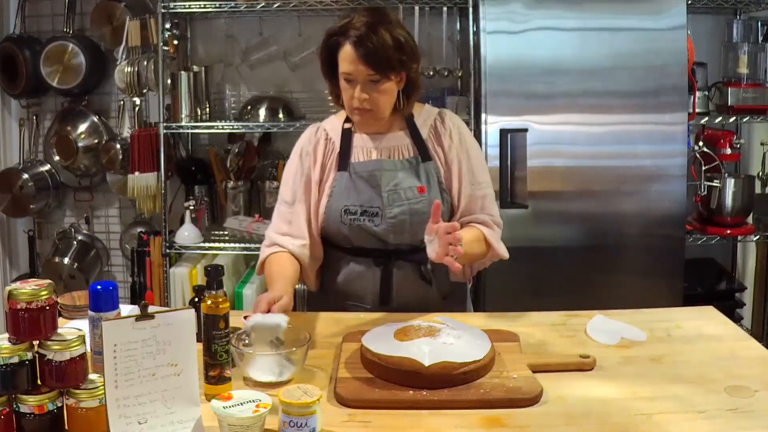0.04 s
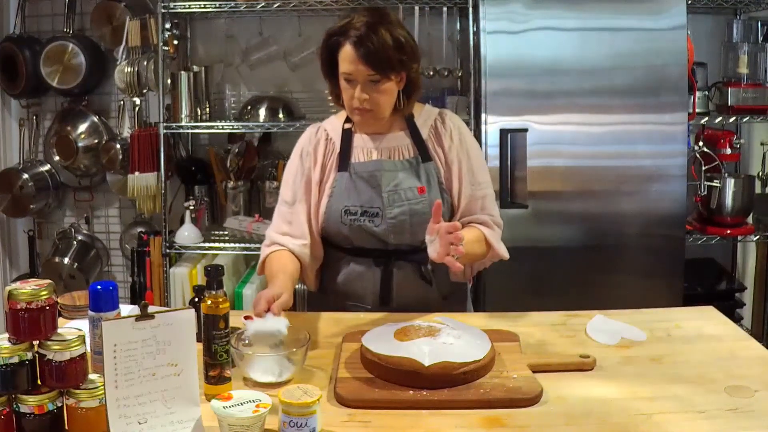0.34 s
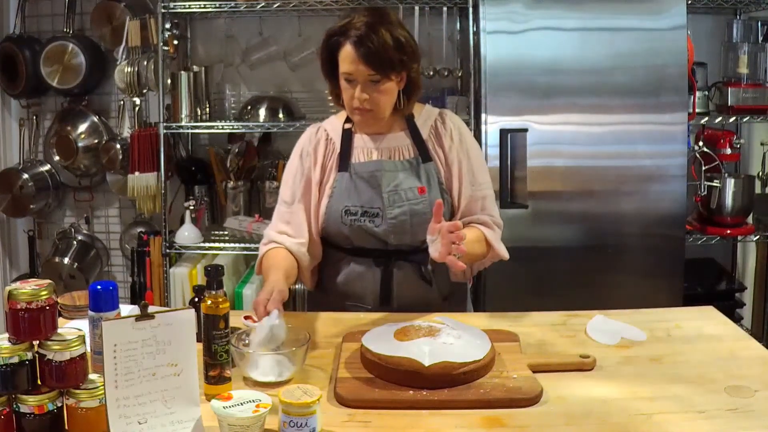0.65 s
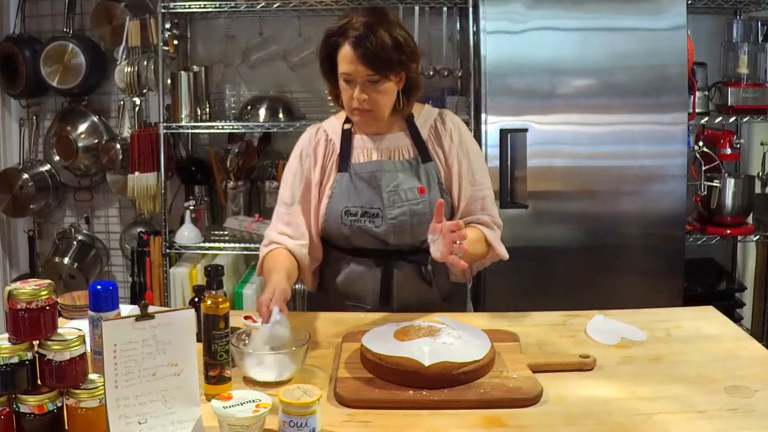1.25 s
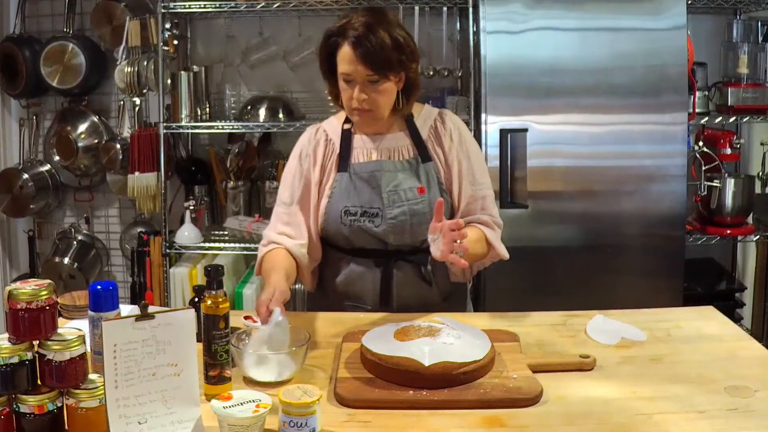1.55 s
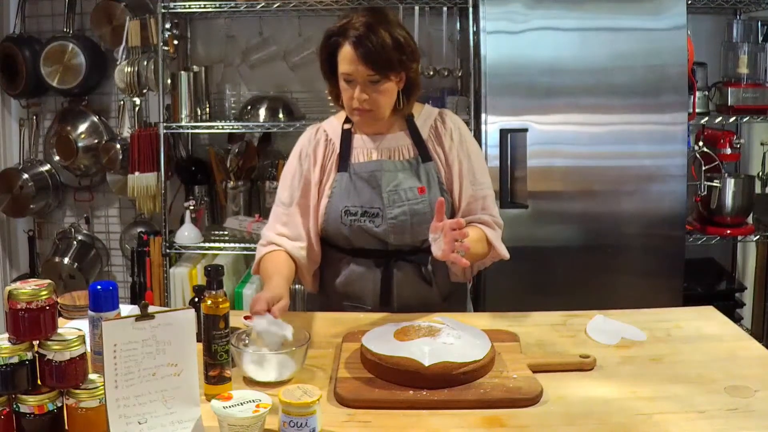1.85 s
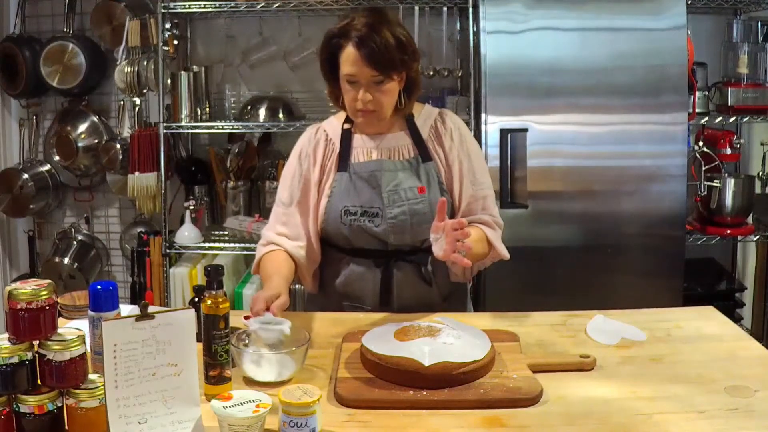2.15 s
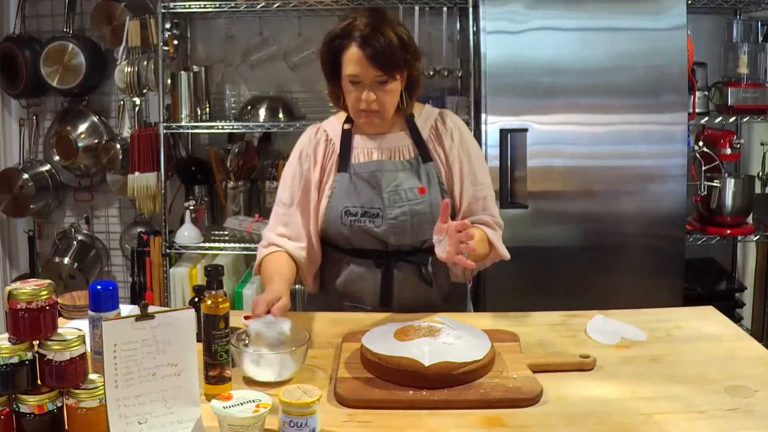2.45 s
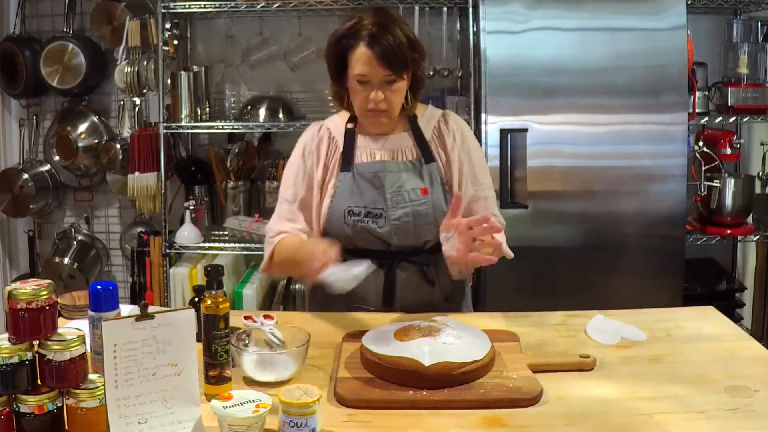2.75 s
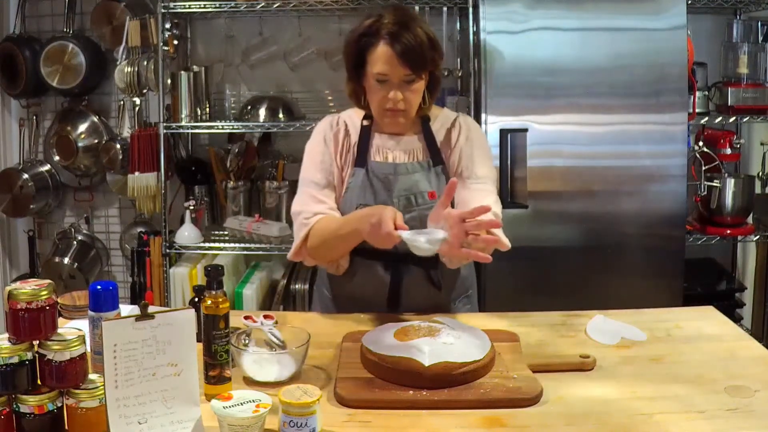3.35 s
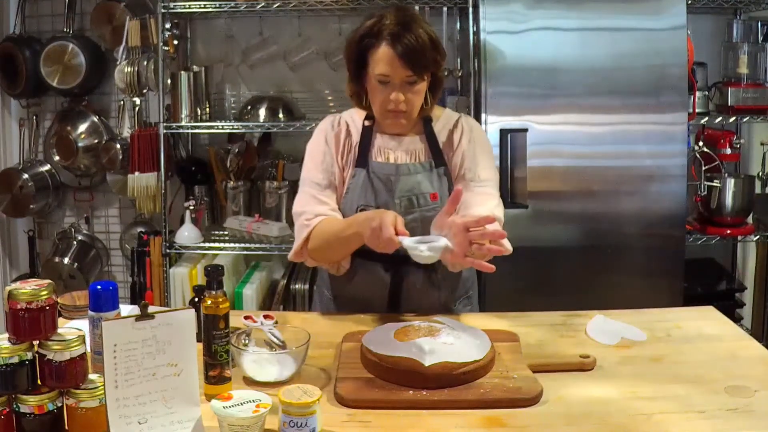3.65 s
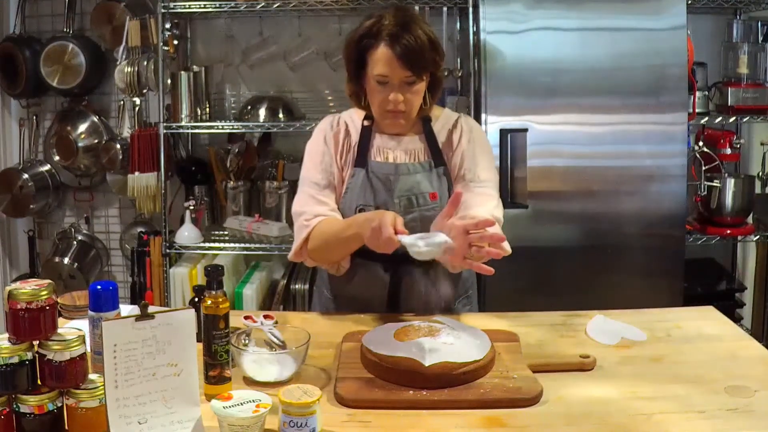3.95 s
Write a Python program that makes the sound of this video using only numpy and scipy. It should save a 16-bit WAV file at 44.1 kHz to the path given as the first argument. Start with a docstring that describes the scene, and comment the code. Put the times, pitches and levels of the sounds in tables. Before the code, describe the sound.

A small utensil clinks and knocks in a glass bowl of powder, then sifts softly.

```python
"""A small utensil scoops powder from a glass bowl on a wooden counter in a small, live kitchen.
Ventilation rumble, hiss and a low hum run throughout. From the start the scoop crunches through the
powder, clinks on the glass and knocks dully, setting bowl and counter ringing. The last knock falls
near 2.6 s and the utensil is lifted. From 2.9 s a fine crackle swells as powder is sifted, with faint
ticks from 3.3 s on."""
import sys
import numpy as np
from scipy import signal
from scipy.fft import rfft, irfft, next_fast_len
from scipy.io import wavfile
from scipy.ndimage import uniform_filter1d

SR = 44100
rng = np.random.default_rng(int(sys.argv[2]) if len(sys.argv) > 2 else 0)


def output_pcm(signal):
    """Save a mono or channel-first signal as 16-bit PCM at the path in sys.argv[1].

    Samples are clipped to [-1, 1] before scaling.
    """
    pcm = np.clip(np.atleast_2d(signal).T, -1, 1) * 32767
    wavfile.write(sys.argv[1], SR, np.round(pcm).astype(np.int16))


N = 176400


def undb(db):
    """Decibels to gain."""
    return 10 ** (np.asarray(db) / 20)


def curve(table, at):
    """Linear interpolation, end values held."""
    return np.interp(at, *np.array(table, float).T)


def over_hz(table, hz):
    """Linear interpolation over log frequency."""
    f, values = np.array(table, float).T
    return np.interp(np.log(np.maximum(hz, 1)), np.log(np.sort(f)), values)


def colour(x, table):
    """Minimum-phase filter from rows of f/Hz, level/dB."""
    n = 2 * next_fast_len(x.shape[-1])
    cepstrum = irfft(over_hz(table, np.arange(n // 2 + 1) * SR / n) * np.log(10) / 20)
    cepstrum[1:n // 2] *= 2
    cepstrum[n // 2 + 1:] = 0
    return irfft(rfft(x, n) * np.exp(rfft(cepstrum)))[..., :x.shape[-1]]


def flatten(x, width_hz):
    """Whiten a burst, keeping detail finer than width_hz."""
    power = np.atleast_2d(abs(rfft(x)) ** 2).mean(axis=0)
    smooth = uniform_filter1d(power, int(width_hz * x.shape[-1] / SR) + 1)
    hz = np.fft.rfftfreq(x.shape[-1], 1 / SR)
    return colour(x, np.c_[hz, 10 * np.log10(power.mean() / smooth)][1:])


def level(x, db):
    """Set the rms level."""
    return x * undb(db) / np.sqrt(np.mean(x ** 2))


def add(out, start_s, sound):
    """Mix a sound in at start_s."""
    i = max(int(start_s * SR), 0)
    out[i:i + len(sound)] += sound[:N - i]


def pan(x, left_db):
    """Place a sound by level difference."""
    return x * undb(np.array([[left_db], [-left_db]]) / 2)


def grains(rate_per_s, spread_db):
    """Random tiny impacts of uneven size."""
    hits = (rng.random(N) < rate_per_s / SR) * rng.choice([-1, 1], N)
    return hits * undb(spread_db * np.clip(rng.standard_normal(N), -2, 2))


def tick(spectrum, decay_s=0.00085):
    """Hard contact: a short noise crack of unit energy."""
    t = np.arange(SR // 50) / SR
    burst = rng.standard_normal(len(t)) * np.exp(-t / decay_s)
    crack = colour(flatten(burst, width_hz=1200), spectrum)
    return crack / np.sqrt(np.sum(crack ** 2))


def ring(modes, blows, scatter_db):
    """Decaying modes; each blow lands on another spot and weights them differently."""
    t, out = np.arange(SR) / SR, np.zeros(N)
    hz, mode_db, t60_s = np.array(modes, float).T
    waves = np.sin(2 * np.pi * hz[:, None] * t)
    for start_s, db, t60_share in blows:
        gains = undb(db + mode_db + scatter_db * rng.standard_normal(len(modes)))
        decay = np.exp(-np.log(1000) * t / (t60_s[:, None] * np.clip(t60_share, .1, 1)))
        add(out, start_s, gains @ (waves * decay))
    return out


# side re mid in diffuse sound: f/Hz, level/dB
SIDE_SPECTRUM = [(60, -39.5), (250, -25), (500, -17.5), (1000, -12), (2000, -8.5), (4000, -1.5),
                 (9000, 3.5)]
def diffuse(size):
    """Stereo noise, narrow in the bass, wide in the treble."""
    mid, side = rng.standard_normal((2, size))
    side = colour(side, SIDE_SPECTRUM)
    return np.array([mid + side, mid - side])


# rumble and hiss: f/Hz, level/dB
VENT_SPECTRUM = [(15, 0.5), (35, -11), (55, -8.5), (90, 0), (130, -7), (200, -14), (400, -20.5),
                 (800, -28.5), (1500, -34.5), (3000, -37.5), (6000, -40.5), (9000, -44), (13300, -53),
                 (14500, -86)]
def ventilation():
    """Steady diffuse rumble with soft hiss."""
    return level(colour(diffuse(N), VENT_SPECTRUM), db=-33.5)


# hum rms: t/s, level/dB
HUM_ENVELOPE = [(.38, -39), (.55, -33), (.95, -34.5), (1.1, -42)]
def hum(hz=56.6):
    """Low tone that swells briefly."""
    t = np.arange(N) / SR
    return undb(curve(HUM_ENVELOPE, t)) * np.sqrt(2) * np.sin(2 * np.pi * hz * t)


# scoop pressure in the powder: t/s, level/dB
SCOOP_PRESSURE = [(0, -8), (.3, -4), (.6, 1.5), (.78, -19.5), (.95, -4), (1.14, 3), (1.26, -11), (1.55, 2),
                  (1.76, -24), (2.1, -9), (2.3, -47)]
# powder crunch: f/Hz, level/dB
SCRAPE_SPECTRUM = [(60, -8.5), (160, -5), (450, -3), (900, -4.5), (2000, -18.5), (4000, -35), (12000, -46)]
def scrape():
    """Powder crunches dully as the scoop pushes through."""
    crunch = colour(grains(rate_per_s=900, spread_db=4.5), SCRAPE_SPECTRUM)
    return level(crunch, db=-34) * undb(curve(SCOOP_PRESSURE, np.arange(N) / SR))


# utensil on glass: t/s, tick level/dB, ring level/dB, share of t60 left/1
GLASS_HITS = [(0.0122, -7, -7.5, 0.93), (0.153, -2, -1, 0.67), (0.3074, -0.5, 0, 0.28),
              (0.378, -15.5, -18, 0.43), (0.4425, -25, -8, 0), (0.4628, 0.5, 2.5, 0.41),
              (.586, -27, -10, 1), (0.8552, -15.5, -9, 0.6), (0.983, -12.5, -3.5, 0.5),
              (1.1468, -17.5, -7.5, 0.8), (1.295, -22.5, -20, 1), (1.4195, -14.5, -4.5, 0.28),
              (1.5625, -14, -6, 0.72), (1.916, -7, -5, 0.9), (2.0587, -5, -3.5, 0.85),
              (2.2703, -15.5, -18, 1), (2.3855, -3.5, -5.5, 0.72), (2.5247, -2, -3.5, 0.52)]
# contact crack: f/Hz, level/dB
CLINK_SPECTRUM = [(300, 8), (1500, -3), (2500, -6), (4200, 2), (5400, 0), (6500, 3.5), (8200, 4),
                  (9400, -6), (10300, -7), (11500, -10), (14000, -16.5), (16000, -28)]
def clinks(gain_db=3.5):
    """The utensil ticks against the glass."""
    out = np.zeros(N)
    for start_s, db, _, _ in GLASS_HITS:
        add(out, start_s, undb(gain_db + db) * tick(CLINK_SPECTRUM))
    return out


# bowl modes: f/Hz, level/dB, t60/s
GLASS_MODES = [(1966, 8.5, 0.48), (3350, -7.5, 0.31), (8100, -26, 0.043)]
def glass_ring(gain_db=-31):
    """The bowl rings after each clink, damped by the touching utensil."""
    blows = [(start_s, db, t60_share) for start_s, _, db, t60_share in GLASS_HITS]
    return undb(gain_db) * ring(GLASS_MODES, blows, scatter_db=2.5)


# dull blows of utensil and bowl: t/s, level/dB, f/Hz
KNOCK_HITS = [(.013, -9, 815), (.0505, 0, 945), (.155, -7, 760), (0.2039, -6, 920), (0.273, -14.5, 810),
              (.311, 1.5, 960), (0.373, -1.5, 840), (0.442, 1.5, 975), (0.4647, -8.5, 660),
              (0.5221, -0.5, 820), (0.5313, -6.5, 860), (0.5784, -6, 810), (0.587, -4.5, 940),
              (0.6223, -7.5, 830), (0.8556, -8, 880), (0.9025, -6.5, 870), (0.962, -16, 960),
              (0.9843, -0.5, 890), (0.9962, -16.5, 910), (1.0442, 0.5, 920), (1.0999, -8.5, 810),
              (1.1509, -4, 840), (1.297, -13, 840), (1.4214, -3, 840), (1.435, -6.5, 840),
              (1.4689, -0.5, 955), (1.5655, 1.5, 950), (1.6027, -2, 920), (1.917, -10.5, 566),
              (1.945, -16.5, 854), (2.061, -11.5, 560), (2.091, -14, 800), (2.269, -22.5, 610),
              (2.3886, -8, 605), (2.4121, -14.5, 960), (2.526, -7.5, 585), (2.5636, -11, 900)]
# knock filter: f/Hz, level/dB
KNOCK_SPECTRUM = [(40, -13), (130, -1.5), (230, 6), (500, 2.5), (1000, -0.5), (1500, 3), (2100, 7.5),
                  (3000, 3), (4500, -35), (9000, -45)]
def knocks(gain_db=-9.5, rise_s=0.00057, crunch_decay_s=0.0028):
    """Cushioned blows: two or three heavily damped cycles and a short powder crunch."""
    t, out = np.arange(SR // 25) / SR, np.zeros(N)
    envelope = t / rise_s * np.exp(1 - t / rise_s)
    for start_s, db, hz in KNOCK_HITS:
        body = envelope * np.sin(2 * np.pi * hz * t)
        burst = rng.standard_normal(len(t)) * np.exp(-t / crunch_decay_s)
        crunch = colour(burst, [(1200, -9), (2000, -13.5), (5000, -20)])
        crunch = level(crunch, db=-10.5) * body.std()
        add(out, start_s, -undb(gain_db + db) * (body + crunch))
    return colour(out, KNOCK_SPECTRUM)


# modes of the counter carrying the bowl: f/Hz, level/dB, t60/s
COUNTER_MODES = [(209.7, 5.5, 0.44), (258.2, 4.5, 0.59), (393, -11, 0.16), (469, 1.5, 0.48),
                 (520.6, 5.5, 0.12), (758, 4, 0.48), (908, -0.5, 0.45), (991, -1, 0.43), (1120, 6, 0.16),
                 (1379, -22.5, .28)]
def counter_ring(gain_db=-39):
    """The counter rings freely after each knock."""
    blows = [(start_s, db, 1) for start_s, db, _ in KNOCK_HITS]
    return undb(gain_db) * ring(COUNTER_MODES, blows, scatter_db=3.5)


# near reflection: f/Hz, level/dB
BOUNCE_SPECTRUM = [(1000, -1), (1800, -0.5), (4000, -11), (10000, -7.5)]
def bounce(x, delay_s=0.002086):
    """A hard surface close by doubles each contact with a duller copy."""
    out = x.copy()
    add(out, delay_s, colour(x, BOUNCE_SPECTRUM))
    return out


# reverberation time: f/Hz, t60/s
TAIL_T60 = [(100, 0.27), (250, 0.5), (600, 0.29), (3500, 0.27), (12000, 0.37)]
def room_tail(t):
    """Diffuse reverberation, each band decaying at its own rate."""
    f = np.fft.rfftfreq(len(t), 1 / SR)
    noise_spectrum = rfft(diffuse(len(t)))
    centres_hz = np.geomspace(60, 16000, 12)
    tail = 0
    for hz, weights in zip(centres_hz, np.eye(len(centres_hz))):
        band = irfft(noise_spectrum * over_hz(list(zip(centres_hz, weights)), f))
        tail = tail + band * np.exp(-np.log(1000) * t / over_hz(TAIL_T60, hz))
    return tail


# reflections off counter, shelves and walls: t/ms, level/dB
EARLY_ECHOES = [(7.9, 2.5), (13.1, -17.5), (15.2, -9.5), (27.6, -17)]
# scatter and tail: f/Hz, level/dB
ROOM_SPECTRUM = [(60, -7), (140, 2), (230, 9), (500, 0.5), (1000, 0), (2000, -5.5), (4000, 1), (9300, -1),
                 (14000, 0)]
def kitchen(x, onset_s=0.0074, scatter_decay_s=0.005):
    """Quick scatter from nearby things, a few distinct reflections, a short tail."""
    size = 2 * SR // 3
    t = np.arange(size) / SR
    onset = 1 - np.exp(-(t / onset_s) ** 2)
    tail = level(room_tail(t) * onset, db=-1)
    scatter = level(diffuse(size) * np.exp(-t / scatter_decay_s) * onset, db=-6.5)
    reverb = colour(flatten(tail + scatter, width_hz=70), ROOM_SPECTRUM) / np.sqrt(size)
    early = np.zeros(size)
    for ms, db in EARLY_ECHOES:
        early[int(ms * SR / 1000)] += undb(db)
    response = reverb + colour(early, [(1500, -6.5), (6000, -12.5)])
    return signal.fftconvolve(x[None], response, axes=1)[:, :N]


def shifting_room(x, dwell_s=.14, spots=3):
    """The moving utensil excites the room differently: one response per spot, taken in rotation."""
    spot = (np.arange(N) / SR // dwell_s) % spots
    out = 0
    for k in range(spots):
        gate = 1. * (spot == k)
        crossfade = uniform_filter1d(uniform_filter1d(gate, size=200), size=200)
        out = out + kitchen(x * crossfade)
    return out


# powder flow: t/s, level/dB
SIFT_FLOW = [(2.9, -13), (3.3, -0.5), (3.9, 2)]
# sifting ticks: t/s, level/dB
SIFT_HITS = [(3.2996, -1), (3.609, -4.5), (3.6232, -0.5), (3.662, -11), (3.724, -6), (3.84, -5),
             (3.924, -4.5)]
# specks and ticks: f/Hz, level/dB
SIFT_SPECTRUM = [(1000, -5), (5000, -0.5), (8000, 10), (9500, 2.5), (11000, -5), (14000, -7)]
def sifting(tick_gain_db=-17.5):
    """Powder shaken out: fine crackle and a few clearer ticks."""
    specks = colour(grains(rate_per_s=120, spread_db=6), SIFT_SPECTRUM)
    out = level(specks, db=-57.5) * undb(curve(SIFT_FLOW, np.arange(N) / SR))
    for start_s, db in SIFT_HITS:
        add(out, start_s, undb(tick_gain_db + db) * tick(SIFT_SPECTRUM))
    return out


def scene(ring_send_db=-7.5):
    """Bowl centred, sifting slightly left; the room answers both."""
    contacts = bounce(clinks() + knocks()) + scrape()
    rings = glass_ring() + counter_ring()
    sift = sifting()
    room = shifting_room(contacts + undb(ring_send_db) * rings + sift)
    return contacts + rings + pan(sift, left_db=1) + room + ventilation() + hum()


def record(dry):
    """The microphone sums delayed copies, notching the treble; left is brighter, with a DC offset."""
    lag_s, copies, cutoff_hz, left_dc = 1.033e-4, 4, 15000, -.028
    f = np.fft.rfftfreq(2 * N, 1 / SR)
    comb = np.mean([np.exp(-2j * np.pi * f * k * lag_s) for k in range(copies)], axis=0)
    left_db = over_hz([(1000, 0.3), (4500, 0), (8500, 3.5), (13000, 4.0)], f)
    tilt = undb(np.array([left_db, -left_db]) / 2)
    out = irfft(rfft(dry, 2 * N) * comb * tilt)[:, :N]
    lowpass = signal.ellip(8, .2, 70, cutoff_hz, fs=SR, output="sos")
    return signal.sosfilt(lowpass, out) + np.array([[left_dc], [0]])


dry = scene()
out = record(dry)
output_pcm(out)
```